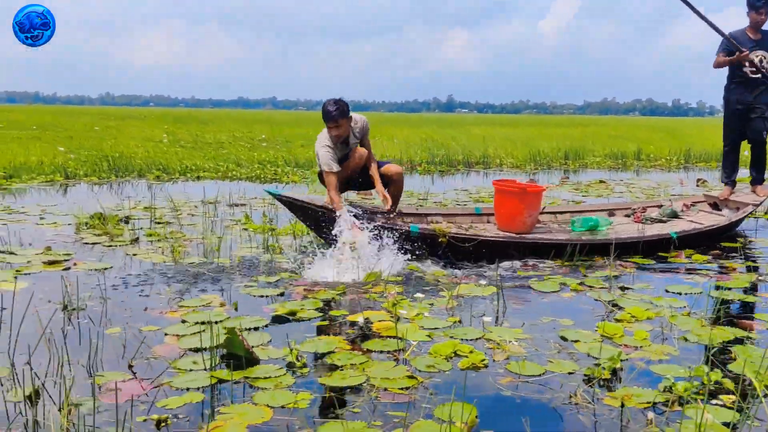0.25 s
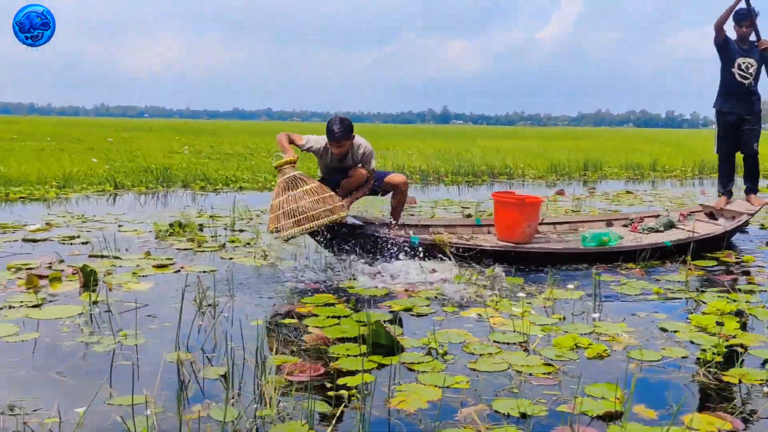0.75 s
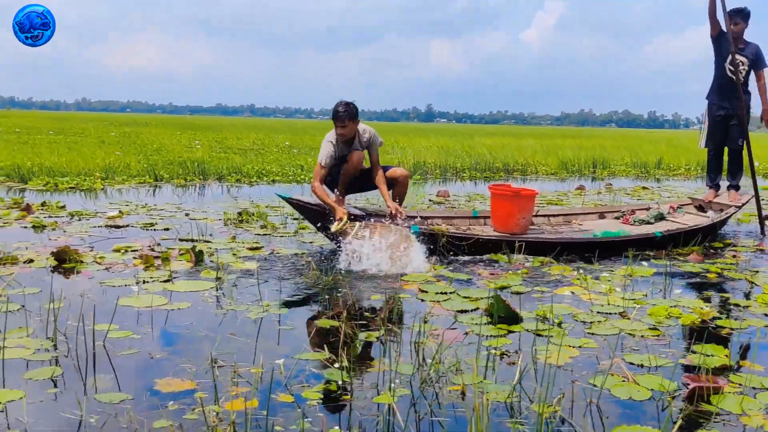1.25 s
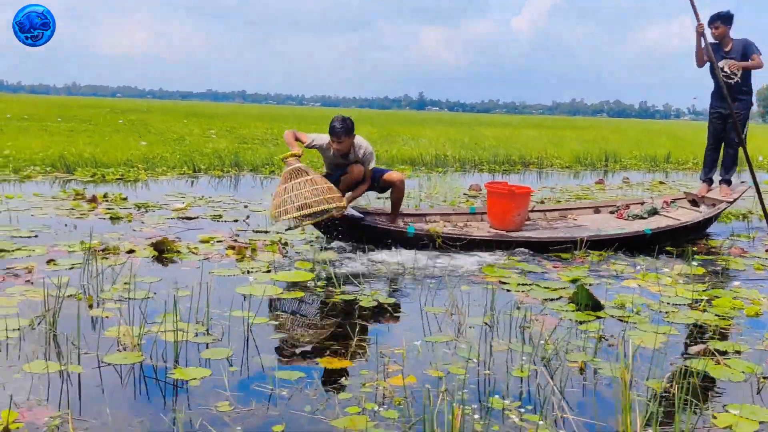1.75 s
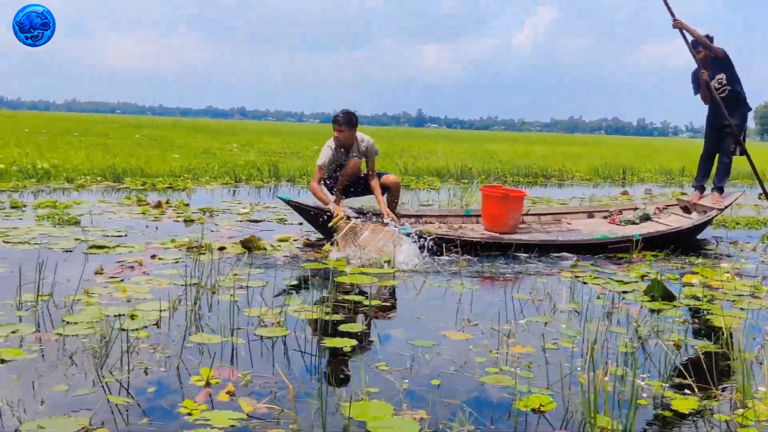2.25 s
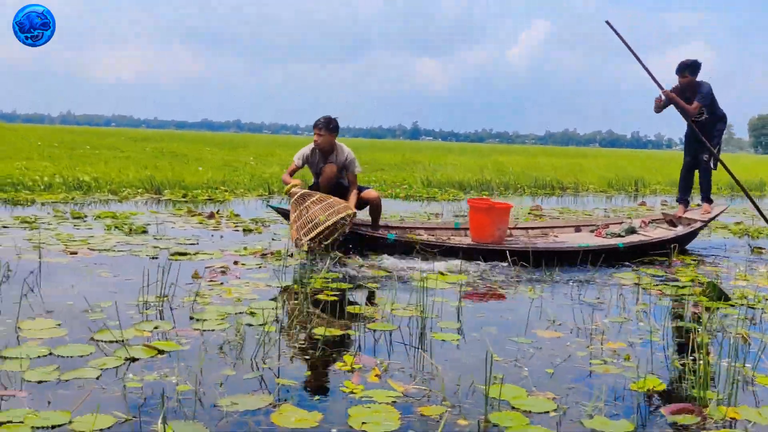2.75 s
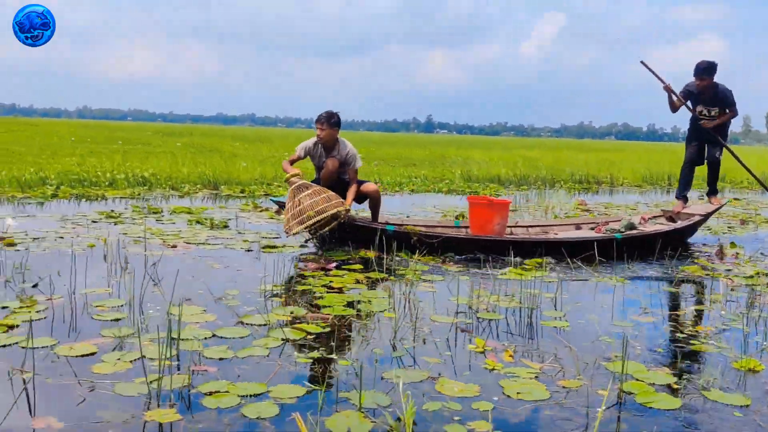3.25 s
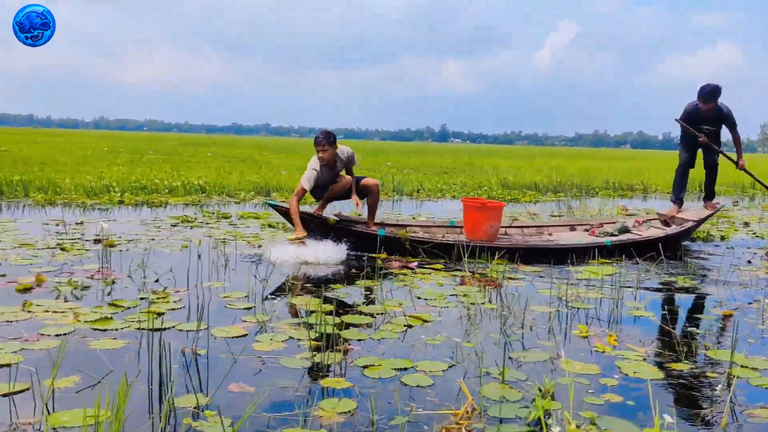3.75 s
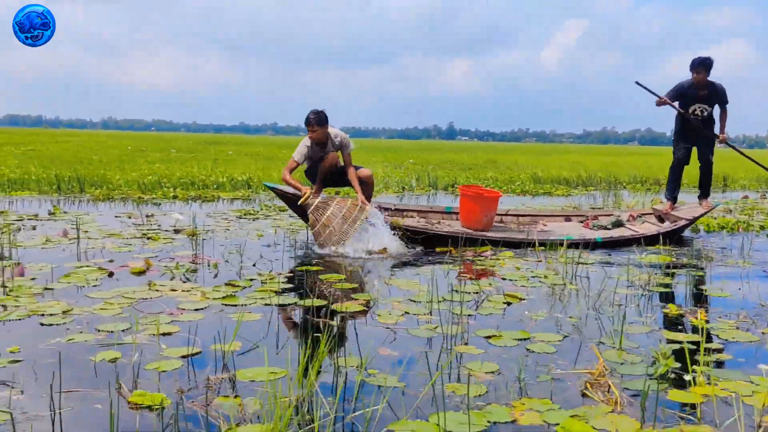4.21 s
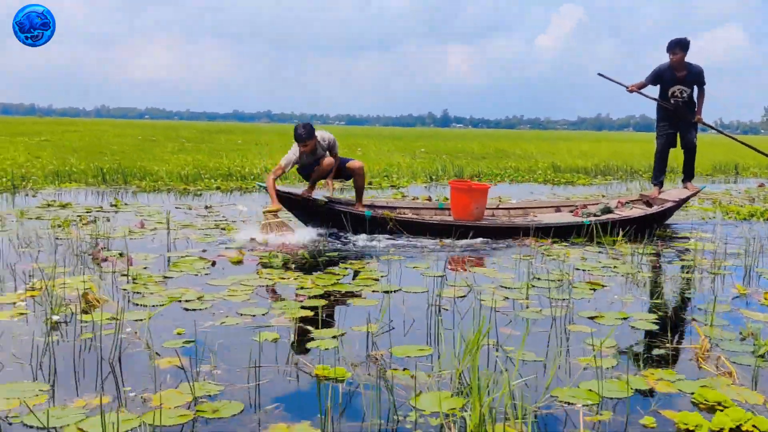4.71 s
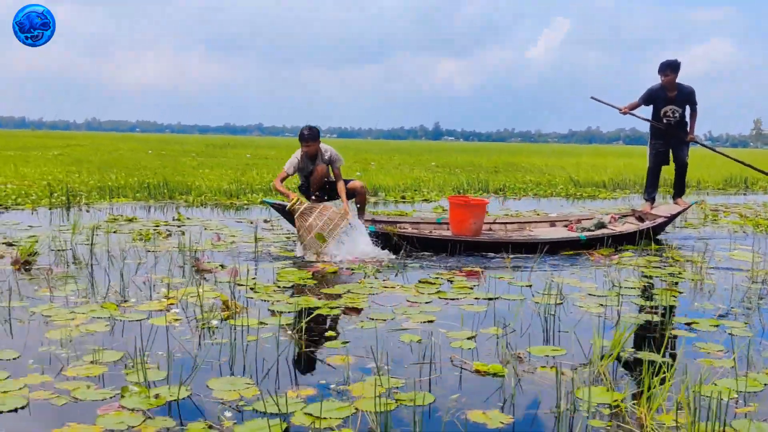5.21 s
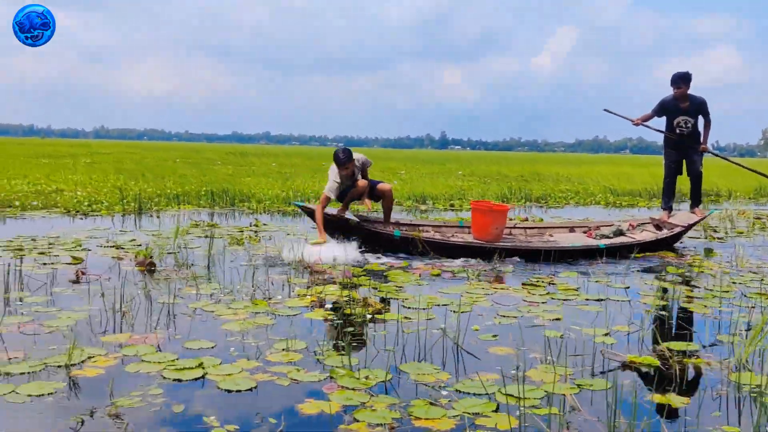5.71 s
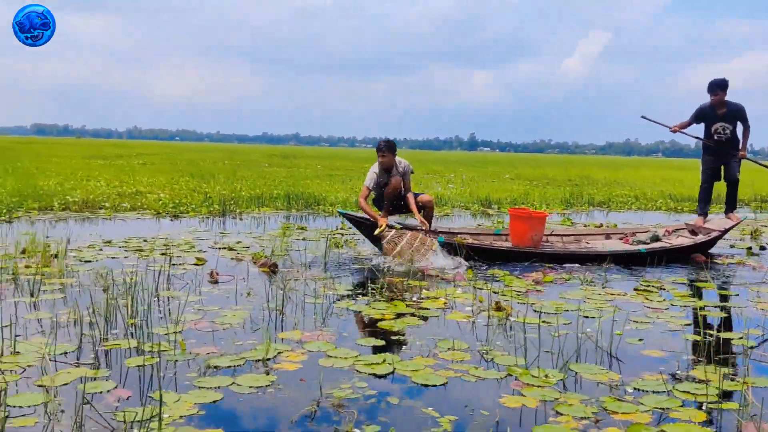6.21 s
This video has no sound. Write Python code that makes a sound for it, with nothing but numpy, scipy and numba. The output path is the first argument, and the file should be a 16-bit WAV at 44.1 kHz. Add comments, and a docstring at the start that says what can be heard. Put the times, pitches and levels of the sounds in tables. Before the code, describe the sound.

Repeated wet plunges of a basket trap beside a wooden boat: brisk splash, deep gurgle, streaming drips on each lift. Around the middle the splashing pauses for a cluster of woody, hollow knocks and slat rattle with tiny drips. Plunging resumes until the end, where one sharp dry crack sounds close at left. No echo; open air, with lumpy low wind buffeting each side of the microphone differently.

```python
"""A cone trap of split bamboo is thrust again and again into shallow water from a wooden boat some metres away.
Slaps of spray, gurgle and streaming are filtered noise and swarms of dying sines with rising pitch;
large air pockets and single drops are placed one by one. Between thrusts the trap knocks on the hull,
made of struck plank modes and sliding hollow rings. One dry snap sounds close to the left port. Wind
buffets the two ports of a hand-held microphone, each in its own way: lumpy low noise and single pushes."""
import sys
import numpy as np
from scipy import signal
from scipy.fft import rfft, irfft, next_fast_len
from scipy.io import wavfile
from numba import njit

SR = 44100
rng = np.random.default_rng(int(sys.argv[2]) if len(sys.argv) > 2 else 0)


def dump_mix(stems):
    """Bounce the given channels to the path in sys.argv[1] as a 16-bit WAV at rate SR."""
    frames = np.atleast_2d(stems).T  # one column per channel
    limited = np.clip(frames, -1, 1)  # hard clip at full scale
    pcm = np.round(limited * 32767).astype(np.int16)
    wavfile.write(sys.argv[1], SR, pcm)


N = 285327

# Thrusts of the trap, with slap, spray and gurgle, then the gurgle and spray of the lift. Levels are relative:
# rim_hit_s, slap_db, spray_db, plunge_gurgle_db, lift_s, pour_gurgle_db, stream_spray_db
THRUSTS = [(-0.8, -25, -35, -31, -0.3, -38, -46), (0.0348, -18, -30, -29.5, 0.54, -39, -45.5),
           (0.844, -33, -33.5, -32, 1.3, -36, -46.5), (1.8323, -26, -34.5, -31, 2.33, -37, -47.5),
           (3.697, -27, -36, -30.5, 4.27, -37, -46.5), (4.697, -22.5, -36.5, -32, 5.21, -38, -48.5),
           (5.6487, -35, -37.5, -31.5, 6.15, -44.5, -51.5)]


def water():
    """Gurgle of middling bubbles with stray drips and froth, and spray of fine drops on hiss."""
    # froth against gurgle, thrust by thrust: time_s, froth_db
    froth_curve = [(0.2, -12), (1.0, -6), (2.0, -10), (3.2, -9), (4.0, -7), (5.0, -10), (5.8, -7)]
    gurgle_db, spray_db = stirring()

    gurgle = bubbles(1000., 174.7, 2744.0, cycles=19.0, spread_db=1.2, clump_db=2.4, clump_rate=25., rise=0.56)
    drips = bubbles(70., 498.3, 4484.0, cycles=34., spread_db=1.0, clump_db=3., clump_rate=5., rise=0.614)
    drops = bubbles(8000., 1903.0, 14500.0, cycles=6.2, spread_db=5, clump_db=4.0, clump_rate=14., rise=0.31)
    froth = bubbles(900., 1000., 3200., cycles=16., spread_db=2.5, clump_db=4.5, clump_rate=18., rise=.5)

    froth_gain = amp(in_time(froth_curve)[0])
    gurgle = at_ports(gurgle + amp(-4) * drips + froth_gain * froth, apart_s=1.3)
    gurgle = gurgle / np.std(cut(gurgle.mean(0), [500, 1600], "band"))

    hiss = cut(rng.standard_normal(N), 1500, "high")
    spray = at_ports(drops + amp(-6.5) * hiss, apart_s=1.3)
    spray = spray / np.std(cut(spray.mean(0), [2000, 8000], "band"))

    # the finest mist swells with the spray up to a ceiling, and it comes in patches
    mist = cut(cut(spray, 13000, "high"), 13000, "high")
    fineness = amp(.85 * (np.minimum(spray_db, -39) + 44) + 3 * drift(8.))
    spray = spray + (fineness - 1) * mist
    return amp(gurgle_db) * gurgle + amp(spray_db) * spray


def stirring():
    """Levels in dB of gurgle and spray: thrust, plunge, slosh and lift add in power over calm lapping."""
    # each swell: delay_s, rise_db_per_s, fall_db_per_s
    spray_up = (.014, 400, 165)   # spray thrown by the thrust
    plunge = (.11, 116, 128)      # air dragged under by the sinking trap
    slosh_left = (.11, 116, 25)   # slosh left after the plunge
    pour = (0.001, 36, 36.7)      # water pouring out on the lift
    stream = (0.001, 5.1, 12)     # slats streaming and dripping around the lift
    slosh_db = -6.5               # against the peak of the plunge
    calm_gurgle_db, calm_spray_db = -49, -60

    hit_s, _, spray_db, plunge_db, lift_s, pour_db, stream_db = np.transpose(THRUSTS)
    gurgle = swells(hit_s, plunge_db, plunge, since=hit_s)
    gurgle += swells(hit_s, plunge_db + slosh_db, slosh_left)
    gurgle += swells(lift_s, pour_db, pour, since=hit_s)
    spray = swells(hit_s, spray_db, spray_up, since=hit_s)
    spray += swells(lift_s, stream_db, stream, since=hit_s)
    return 10 * np.log10(gurgle + amp(2 * calm_gurgle_db)), 10 * np.log10(spray + amp(2 * calm_spray_db))


def swells(times, peak_db, shape, since=None):
    """Power of swells that rise to each peak and fall from it at steady dB rates; none begins before since."""
    delay_s, rise, fall = shape
    t = np.arange(N) / SR
    late = t - (times + delay_s)[:, None]
    below_peak_db = np.where(late < 0, -rise * late, fall * late)
    power = amp(2 * (peak_db[:, None] - below_peak_db))   # doubled dB: power, not amplitude
    if since is not None:
        power = power * (t > since[:, None])
    return power.sum(0)


def slaps():
    """A sheet of spray thrown at once by the rim: a dying burst of band-limited noise."""
    hit_s, slap_db = np.transpose([row[:2] for row in THRUSTS if row[0] > 0])
    noise = burst(hit_s, slap_db + 4.5, t60=0.1, soft_s=.003)
    return at_ports(cut(noise, [1500, 7000], "band"), apart_s=.02)


def glugs():
    """Each pocket or soft knock starts with a splat and rings once, rising; low ones ring fewer cycles."""
    # large air pockets closing, and soft low hull knocks around 4.5 s, levels relative:
    # start_s, level_db, nominal_pitch_hz, splat_against_ring_db
    pockets = [(0.042, -10, 331, -18.5), (0.104, -22, 622, -20), (0.117, -16, 720, -19),
               (0.132, -19, 720, -22), (0.143, -19, 760, -16), (0.255, -24, 340, -20),
               (0.446, -21, 290, -16), (0.45, -21, 620, -13), (0.557, -19.5, 610, -18),
               (0.868, -13.5, 744, -13), (0.869, -21, 1290, -25), (0.929, -20, 317, -21),
               (1.023, -15, 660, -13.5), (1.175, -19, 590, -12), (1.264, -19, 290, -20),
               (1.267, -16, 696, -17), (1.385, -25.5, 370, -20), (1.585, -28, 400, -25),
               (1.898, -20, 692, -14), (1.939, -17.5, 744, -16.5), (2.057, -21, 619, -20),
               (2.309, -26, 250, -20), (2.456, -25, 566, -23), (3.52, -34, 1160, -25),
               (3.783, -23, 280, -20), (3.776, -21.5, 647, -12.5), (3.793, -16.5, 683, -27.5),
               (3.648, -30, 560, -18), (3.878, -24, 250, -20), (4.124, -22, 650, -21.5),
               (4.16, -25, 600, -18), (4.472, -23, 320, -20), (4.487, -23, 335, -17),
               (4.564, -31, 320, -11), (4.719, -27, 754, -20), (4.792, -20, 638, -20),
               (4.872, -23, 660, -20), (5.154, -19, 567, -21.5), (5.2, -17.5, 728, -16),
               (5.213, -22.5, 640, -18), (5.597, -25, 1090, -26), (5.613, -32, 1520, -27),
               (5.669, -24, 720, -20), (5.727, -21, 660, -20), (5.741, -21, 754, -14),
               (5.742, -26, 1270, -25), (5.75, -20, 760, -18), (5.808, -25, 686, -20),
               (6.1765, -22, 680, -14), (6.274, -31, 1300, -25)]
    start_s, level_db, pitch_hz, splat_db = np.transpose(pockets)
    starts = (start_s * SR).astype(int)
    cycles = 21. * (pitch_hz / 700) ** .4
    rise = np.full(len(starts), .45)
    ring = add(np.zeros(N), starts, amp(level_db + 1.5), 0.95 * pitch_hz / SR, cycles, rise, 11.)
    splat = cut(burst(start_s, level_db + splat_db + 19, t60=0.06, soft_s=.0015), 2200, "low")
    # the ring has opposite sign at the two ports
    return ring * np.array([[.7], [-.7]]) + at_ports(splat, apart_s=0.0028)


def ticks():
    """Very short bright plinks, each at its own side; at these pitches the ports are near opposite phase."""
    # single drops and slat ticks, levels relative: start_s, level_db, start_pitch_hz, left_minus_right_db
    plinks = [(0.476, -32, 5900, 0), (0.6848, -28, 4820, 13), (2.98, -38, 3300, 0),
              (2.6454, -37, 5680, -0.5), (2.9701, -37, 6070, -15), (3.0679, -42, 6180, -6),
              (3.2725, -38, 6240, -2.5), (3.4306, -37, 4900, -8), (3.5932, -35, 5950, -15),
              (4.286, -29.5, 5900, -14), (4.3565, -33, 5530, -1.5), (4.4333, -34, 5580, 2),
              (4.4912, -27, 4960, 11), (5.5737, -34, 6310, -12)]
    start_s, level_db, pitch_hz, pan_db = np.transpose(plinks)
    starts, cycles = (start_s * SR).astype(int), np.full(len(start_s), 16.)
    ports = []
    for side in (1, -1):
        sizes = amp(level_db + 5 + side * pan_db / 2)
        ports.append(add(np.zeros(N), starts, sizes, pitch_hz / SR, cycles, cycles / 80, 6.))
    left, right = ports
    return np.array([left, -right])


def knocks():
    """Every blow is a short soft push on the planks, at a spot of its own; harder blows reach the higher modes."""
    # trap against hull, levels relative: start_s, level_db, hardness_db
    blows = [(2.918, -19, -3), (2.926, -9.5, -11), (2.942, -18, -8), (2.952, -18, -8), (2.966, -21, -6),
             (3.019, -23, -9), (3.026, -13.5, -14.5), (3.048, -26, -14), (3.102, -24, -7),
             (3.117, -19, -13), (3.126, -18, -19), (3.173, -35, -3), (3.204, -34.5, -12), (3.257, -26, -16),
             (3.273, -18, -5), (3.286, -18, -16), (3.369, -27, -8), (3.375, -18.5, -11), (3.39, -25, -16),
             (3.435, -33, -10)]
    # modes of the hull planks, levels relative: pitch_hz, level_db, t60_s
    planks = [(200, -10, 0.1), (270, -6, 0.085), (335, -4, 0.08), (400, -6, 0.06), (480, -10, .05),
              (650, -6, 0.05), (772, -8, 0.05), (880, -13, 0.055), (990, -11, 0.05), (1100, -16, 0.05),
              (1334, -23, 0.04), (2010, -29, .03), (2635, -29, .03)]
    start_s, blow_db, hard_db = np.transpose(blows)
    out, soft = np.zeros(N), np.exp(-1 / (.0002 * SR))   # push softened over 0.2 ms
    for pitch_hz, mode_db, t60_s in planks:
        reach_db = (hard_db + 11.5) * np.log2(pitch_hz / 400) * 0.49
        # the spot gives each mode its own delay up to 1.5 ms, level within 2 dB, and sign
        spot = rng.random((len(start_s), 3))
        at = ((start_s + .0015 * spot[:, 0]) * SR).astype(int)
        size = amp(blow_db + mode_db + reach_db - 3.5 + 4 * (spot[:, 1] - .5))
        push = np.full(N, 1e-18)
        push[at] = size * np.sign(spot[:, 2] - .5)
        r, w = amp(-60 / (t60_s * SR)), 2 * np.pi * pitch_hz / SR
        poles = np.convolve([1, -2 * r * np.cos(w), r * r], [1, -soft])
        out += signal.lfilter([0, np.sin(w) * (1 - soft)], poles, push)

    # loose slats shake after the blow
    rattle = burst(start_s, blow_db + 1.5 * hard_db + 16, t60=0.03, soft_s=.0005)
    rattle = cut(cut(rattle, 3800, "low"), 4500, "low")
    # and the planks mutter on
    out += cut(burst(start_s, blow_db - 4, t60=.2), [300, 1200], "band")
    return hull_at_ports(out) + at_ports(rattle, apart_s=.002)


def hollows():
    """The hollow of the trap rings with the blow and slides in pitch as it tilts against the hull."""
    # sliding rings, levels relative: start_s, level_db, start_pitch_hz, half_way_pitch_hz
    slides = [(2.921, -21, 800, 640), (2.9245, -8, 430, 345), (2.948, -14, 400, 340),
              (3.0235, -11.5, 410, 300), (3.122, -13, 305, 385), (3.278, -20, 450, 340),
              (3.287, -18, 270, 240), (3.369, -25, 1020, 720), (3.3745, -16, 355, 330)]
    start_s, level_db, start_hz, half_hz = np.transpose(slides)
    starts, cycles = (start_s * SR).astype(int), np.full(len(start_s), 28.)
    slide = 2 * (half_hz / start_hz - 1)
    return hull_at_ports(add(np.zeros(N), starts, amp(level_db), start_hz / SR, cycles, slide, 9.))


def snap():
    """One broad inward crack with a short rasp, dry and close to the left port."""
    start_s, left_db, right_db = 6.182, -10, -34
    x = burst([start_s - .001], -13, t60=0.006)
    first = int(start_s * SR)
    x[first:first + 4] = -2.3   # the crack: four samples pulled inward
    x = cut(cut(x, 400, "high"), 2700, "low")
    return x * amp([[left_db], [right_db]])


def wind():
    """Lumpy low noise, unrelated between ports, with bursts that push the membrane once and let it swing back."""
    # wind on the left port: time_s, flutter_db, rumble_db
    wind_left = [(0, -28, -29), (.35, -28, -30), (.65, -22.5, -21.5), (1.0, -22.5, -27), (1.25, -26.5, -31),
                 (1.55, -18, -27), (2.0, -18.5, -22), (2.2, -23.5, -29), (2.47, -31, -28),
                 (2.65, -20.5, -32), (2.9, -25.5, -29.5), (3.3, -22, -16), (3.55, -29, -30),
                 (3.68, -47, -42), (3.82, -27.5, -30), (4.25, -28, -31), (4.45, -21.5, -26),
                 (4.65, -20.5, -21), (5.35, -23, -24), (5.6, -20, -21), (6.0, -21.5, -20),
                 (6.23, -17.5, -17.5), (6.41, -22, -24), (6.47, -36, -38)]
    # wind on the sheltered right port: time_s, flutter_db, rumble_db
    wind_right = [(0, -40, -36), (.3, -43, -36), (.6, -34, -25.5), (1.05, -42, -30.5), (1.35, -33, -24.5),
                  (1.6, -25.5, -20), (1.9, -31, -20), (2.45, -25, -20.5), (2.65, -37, -30),
                  (2.95, -37, -31), (3.25, -35, -26.5), (3.52, -41.5, -37), (3.85, -29, -24.5),
                  (4.12, -37, -39), (4.4, -33, -31), (4.8, -43, -36), (5.2, -42, -32), (5.37, -24, -24),
                  (5.55, -38, -32), (6.0, -43, -33), (6.22, -35, -22), (6.47, -42, -38)]
    # spectrum of the deep rumble, only its shape counts: pitch_hz, level_db
    rumble_shape = [(5, 2.5), (12, 7), (22, 18.5), (40, 10), (70, -1), (140, -4.5), (400, -79.5)]
    # spectrum of the faster flutter, only its shape counts: pitch_hz, level_db
    flutter_shape = [(25, -22), (55, 1), (90, -1), (130, -5), (190, -15.5), (300, -31), (600, -43.5),
                     (2000, -104)]
    # eddies bursting on one port: centre_s, peak_db, width_ms, push (1) or pull (-1), port (0 left, 1 right)
    eddies = [(0.6285, -11, 2.5, -1, 0), (0.6884, -8.5, 2.25, 1, 0), (0.7655, -11, 2.8, -1, 0),
              (0.9674, -11, 3.5, 1, 0), (1.21, -13, 6, 1, 1), (1.483, -4.5, 3.7, -1, 0),
              (1.518, -1, 2.9, -1, 1), (1.553, -11, 3.8, 1, 1), (1.578, -4.5, 3.7, 1, 0),
              (1.7818, -12, 4.5, -1, 1), (2.006, -6.5, 6.2, 1, 0), (2.285, -10, 2.9, 1, 0),
              (2.44, -6.5, 4.8, 1, 1), (2.523, -10, 4.4, 1, 1), (2.586, -11, 3.2, -1, 0),
              (2.703, -11, 3.5, -1, 0), (3.281, -9, 5, 1, 0), (3.318, -6, 5.7, 1, 0),
              (3.8955, -14, 4.4, -1, 1), (4.443, -10, 3.8, -1, 0), (4.669, -10.5, 2.4, 1, 0),
              (4.844, -11, 3.8, -1, 0), (5.074, -10.5, 4.4, -1, 0), (5.3517, -11.5, 3.7, -1, 1),
              (5.5652, -2.5, 2.2, -1, 0), (5.571, -11, 3, 1, 0), (5.771, -5, 2.7, 1, 0),
              (5.845, -7.5, 2.8, -1, 0), (6.0755, -8, 6.2, -1, 0), (6.1603, -7, 5.2, -1, 0),
              (6.1945, -12, 1.8, 1, 0), (6.202, -7, 3, -1, 0), (6.2065, -12, 1.3, 1, 0),
              (6.2255, -11, 1.5, 1, 0), (6.2379, -9, 1.6, -1, 0), (6.3075, -8, 3.4, -1, 0),
              (6.398, -1.5, 1.4, 1, 0)]
    gust_db, gusts_per_s = 3.3, 4.5   # random swing of each port's rumble; the flutter swings 0.58 as far
    lump_db = (2.2, 4.5)              # faster lumps in the flutter, left and right

    out = np.zeros((2, N))
    for port, curve in enumerate([wind_left, wind_right]):
        flutter_db, rumble_db = in_time(curve)
        rumble = shaped(rng.standard_normal(N), amp(in_pitch(rumble_shape)[0]))
        rumble = rms_one(rumble * amp(gust_db * drift(gusts_per_s)))
        flutter = shaped(rng.standard_normal(N), amp(in_pitch(flutter_shape)[0]))
        lumps_db = lump_db[port] * drift(19.3) + 0.58 * gust_db * drift(gusts_per_s)
        flutter = amp(flutter_db) * rms_one(flutter * amp(lumps_db))
        out[port] = amp(rumble_db) * rumble + flutter
        # strong flutter bends the membrane and adds overtones, kept above 170 Hz
        out[port] += cut(flutter ** 2, 170, "high")

    t = np.arange(N) / SR
    for centre_s, peak_db, width_ms, push, port in eddies:
        near = slice(int((centre_s - .03) * SR), int((centre_s + 0.026) * SR))
        u = (t[near] - centre_s) / (1.5 * width_ms / 1000)
        swing = (1 - 3 * u ** 2) / (1 + u ** 2) ** 3
        lopsided = 1 + .5 * np.tanh(u)   # the swing after the peak is the larger
        out[int(round(port)), near] += np.sign(push) * amp(peak_db) * swing * lopsided
    return out


def at_ports(x, apart_s):
    """Colour, lag and likeness of each port; the unlike part arrives apart_s from elsewhere on the water."""
    # water as heard at the ports, levels relative: pitch_hz, left_db, right_db, right_lag_rad, likeness (0-1)
    port_colour = [(114, 12, -2, 0.5, 1), (281, 0.5, 1.5, 0.3, 1), (420, -5, -7.5, 0.43, 0.87),
                   (570, -1, -2, -.2, .93), (740, 1.5, 1, -1.0, 1), (925, -6.5, -9, 0.5, 0.7),
                   (1254, -6, -9.5, 0.12, 0.64), (1655, -9, -13.5, 2.5, 0.2), (2327, -14.5, -18, 8.5, 0.58),
                   (2640, -17, -17, 6, 0.71), (3045, -20, -19.5, 10.5, 0.38), (3610, -23, -15, 9, 0.34),
                   (4230, -19, -23.5, 8, 1), (4720, -18.5, -16.5, 7.5, 0.44), (6270, -13.5, -17, 10, 0.37),
                   (7660, -35, -25.5, 10.5, 0), (7920, -31, -37.5, 40, 0.8), (10220, -52, -46, 26, 0.74),
                   (11500, -41.5, -45.5, 23, 0.3), (15400, -54, -50, 24, .3)]
    left_db, right_db, lag_rad, alike = in_pitch(port_colour)
    alike, shift = np.clip(alike, 0, 1), int(apart_s * SR)
    both = np.array([amp(left_db), amp(right_db) * np.exp(-1j * lag_rad)])
    shared = shaped(x, np.sqrt(alike) * both)
    elsewhere = np.array([np.roll(x, shift), np.roll(x, 2 * shift)])
    return shared + shaped(elsewhere, np.sqrt(1 - alike) * amp([left_db, right_db]))


def hull_at_ports(x):
    """Hull sound is a little louder at the left port; the right port hears it nine samples earlier, same sign."""
    return np.array([x * amp(1.2), np.roll(x, -9) * amp(-1.2)])


def bubbles(per_s, low_hz, high_hz, cycles, spread_db, clump_db, clump_rate, rise):
    """Bubbles born in clumps, pitches even on a log scale, sizes set for a flat spectrum; rms 1."""
    births = per_s * amp(clump_db * drift(clump_rate)) / SR
    starts = np.flatnonzero(rng.random(N) < births)
    u = rng.random((N, 3))[starts]
    hz = low_hz * (high_hz / low_hz) ** u[:, 0]
    sizes = hz * amp(-spread_db * np.log(u[:, 1] + 0.03))
    lasting = cycles * (.5 + u[:, 2])
    return rms_one(add(np.zeros(N), starts, sizes, hz / SR, lasting, np.full(len(hz), rise), 6.))


@njit
def add(out, starts, sizes, steps, cycles, rise, swell):
    """Dying sines of sliding pitch, climbing for bubbles; steps in cycles per sample, swell in radians of attack."""
    for k in range(len(starts)):
        length = cycles[k] / steps[k]   # samples to fall by 60 dB
        fall, level, phase = np.exp(-6.9 / length), sizes[k], 0.
        for i in range(min(int(.7 * length), len(out) - starts[k])):
            out[starts[k] + i] += level * min(1., phase / swell) * np.sin(phase)
            phase += 2 * np.pi * steps[k] * (1 + rise[k] * i / length)
            level *= fall
    return out


def burst(times, db, t60, soft_s=1e-5):
    """Noise at each time, with an onset softened over soft_s and a fall of 60 dB in t60 seconds."""
    clicks = np.full(N, 1e-18)
    clicks[(np.asarray(times) * SR).astype(int)] = amp(db)
    r = np.exp(-1 / (soft_s * SR))
    poles = np.convolve([1, -amp(-60 / (t60 * SR))], [1, -r])
    return signal.lfilter([1 - r], poles, clicks) * rng.standard_normal(N)


def drift(rate):
    """Slow random wander of rms 1: noise through a double low-pass at rate Hz, drawn every 40 samples."""
    r = np.exp(-80 * np.pi * rate / SR)
    slow = signal.lfilter([1], [1, -2 * r, r * r], rng.standard_normal(N // 40 + 2002))[2000:]
    return np.interp(np.arange(N) / 40, np.arange(len(slow)), rms_one(slow))


def cut(x, hz, kind):
    """Butterworth low, high or band filter, built from a second-order prototype."""
    return signal.sosfilt(signal.butter(2, hz, kind, fs=SR, output="sos"), x)


def shaped(x, response):
    """x through a response given per FFT bin."""
    size = next_fast_len(N)
    return irfft(rfft(x, size) * response, size)[..., :N]


def in_time(rows):
    """The columns of a curve table at every sample."""
    s, *columns = np.transpose(rows)
    return [np.interp(np.arange(N) / SR, s, c) for c in columns]


def in_pitch(rows):
    """The columns of a spectrum table at every FFT bin, read along log pitch."""
    hz, *columns = np.transpose(rows)
    bins = np.log(np.fft.rfftfreq(next_fast_len(N), 1 / SR) + 1)
    return [np.interp(bins, np.log(hz), c) for c in columns]


def amp(db):
    """Gain of a level in dB."""
    return 10 ** (np.asarray(db) / 20)


def rms_one(x):
    """Scaled to rms 1."""
    return x / np.sqrt(np.mean(x ** 2) + 1e-20)


def scene():
    """Open water, no walls: the sources simply add."""
    return water() + slaps() + glugs() + ticks() + knocks() + hollows() + snap() + wind()


def record(dry):
    """The highest peaks are rounded; the top is cut steeply, 60 dB down from 15.7 kHz."""
    rounded = 1.016 * np.tanh(dry / 1.136)
    return signal.sosfilt(signal.cheby2(16, 60, 15700, fs=SR, output="sos"), rounded)


dry = scene()
out = record(dry)
dump_mix(out)
```